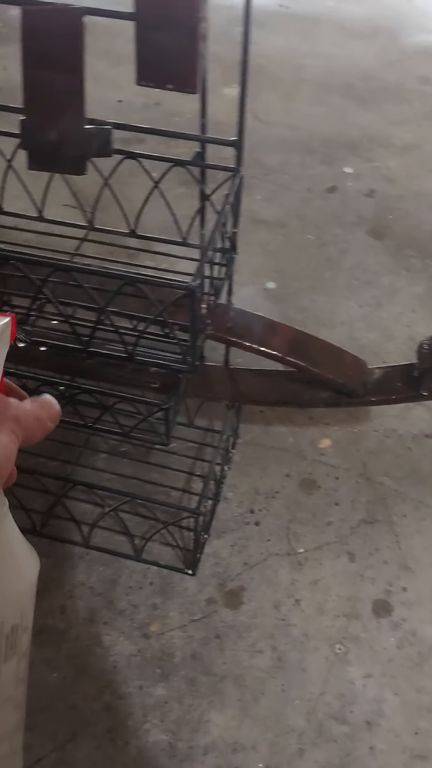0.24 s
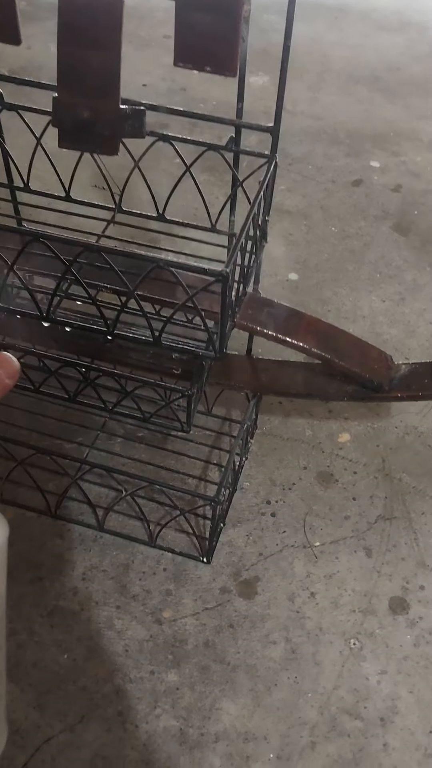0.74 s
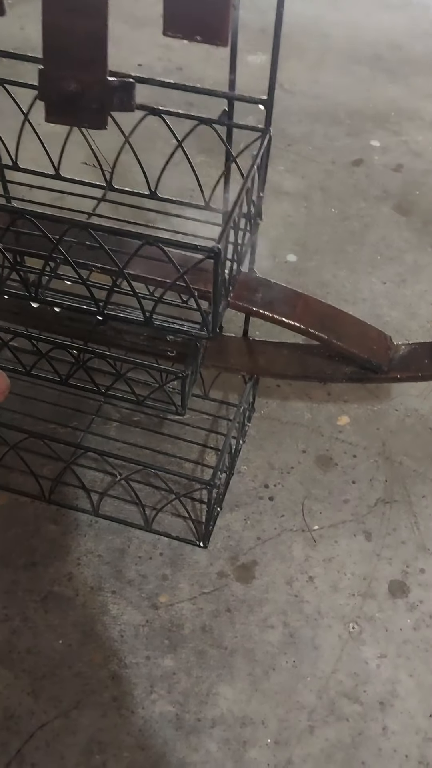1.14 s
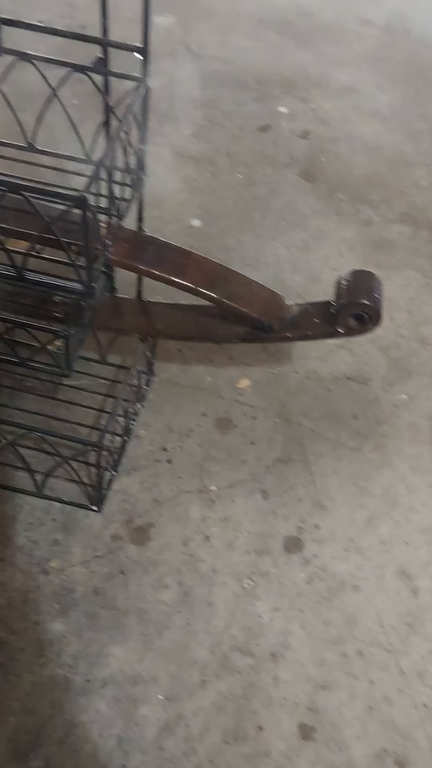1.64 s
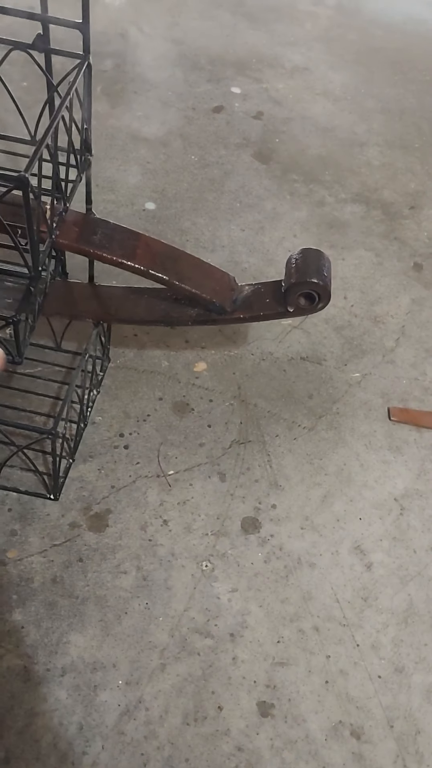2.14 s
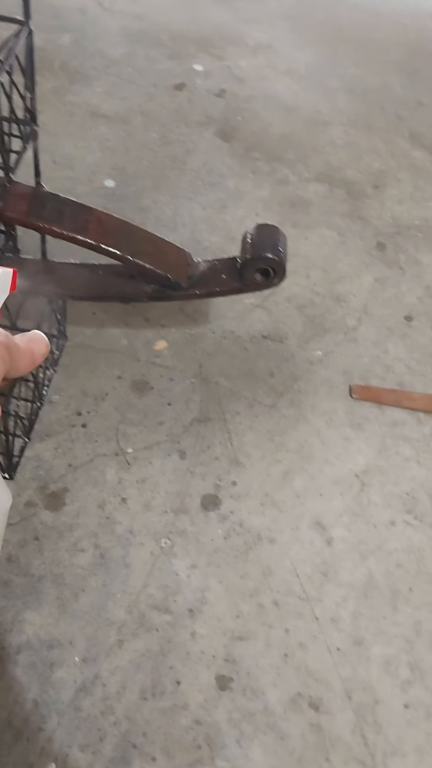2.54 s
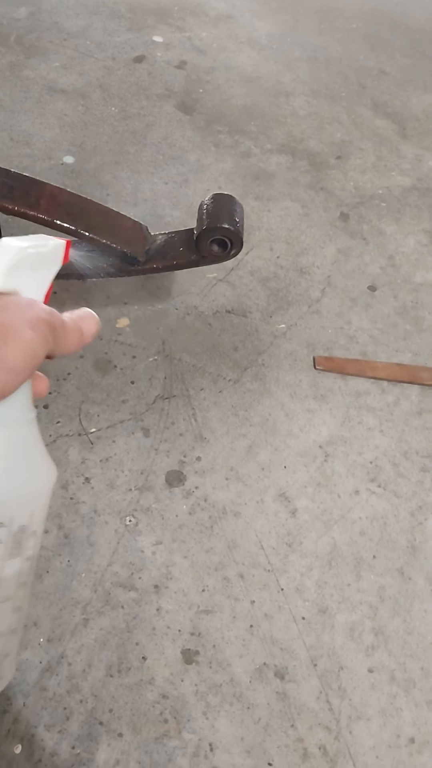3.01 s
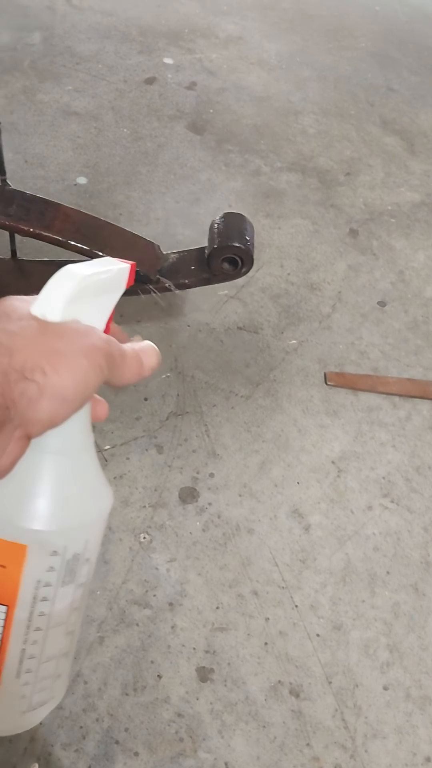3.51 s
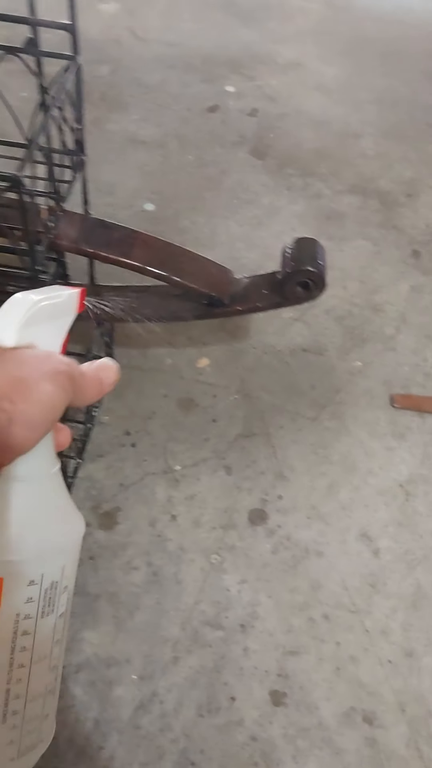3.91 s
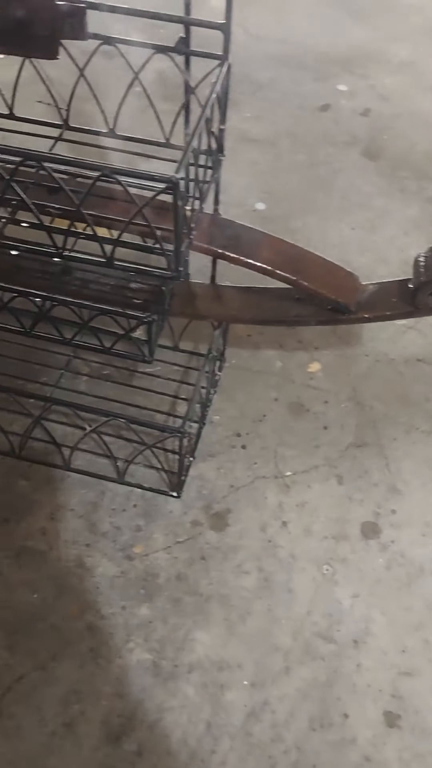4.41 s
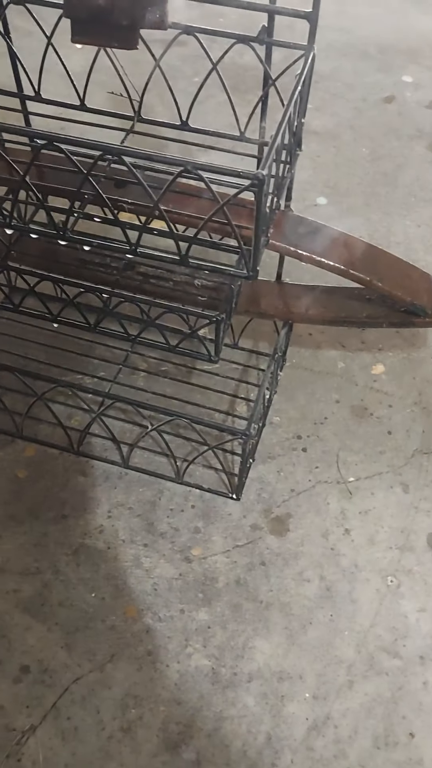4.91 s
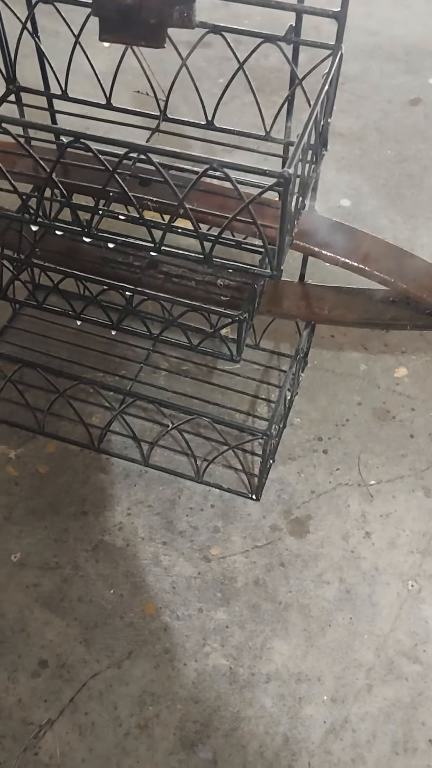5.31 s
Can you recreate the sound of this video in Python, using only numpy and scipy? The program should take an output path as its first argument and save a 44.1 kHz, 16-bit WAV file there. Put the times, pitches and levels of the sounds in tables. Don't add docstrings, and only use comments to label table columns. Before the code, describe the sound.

Phone-like stereo pickup at arm's length in a hard garage: steady rapid squirts of sputtering, fizzy spray, alternating with valve clicks, brief wet suction and small piston thuds. A sharp bottle-on-metal crack lands before two seconds, then a duller knock with a low wobble of the rack. Pumping continues evenly to the end, over fading engine rumble and soft outside traffic murmur.

```python
import sys
import numpy as np
from scipy import signal
from scipy.fft import rfft, irfft, next_fast_len
from scipy.io import wavfile
from scipy.ndimage import uniform_filter1d

SR = 44100
rng = np.random.default_rng(int(sys.argv[2]) if len(sys.argv) > 2 else 0)


def transcribe(u):
    v = np.clip(np.atleast_2d(u).T, -1, 1)
    q = np.round(v * 32767).astype(np.int16)
    wavfile.write(sys.argv[1], SR, q)


def linear_from_db(decibels):
    return 10 ** (np.asarray(decibels, float) / 20)


N = 244755
TIME, HZ = np.arange(N) / SR, np.fft.rfftfreq(N, 1 / SR)


def unit(x):
    return x / np.sqrt(np.mean(x ** 2))


def shape(points):
    hz, db = np.transpose(points)
    return linear_from_db(np.interp(np.log(HZ + 1), np.log(hz + 1), db))


def peak(hz, width):
    return 1j * HZ * width / (hz ** 2 - HZ ** 2 + 1j * HZ * width)


def filt(x, response):
    return irfft(rfft(x) * response, N)


def coloured(response):
    return unit(filt(rng.standard_normal((3, N)), response))


def walk(rate):
    hold = max(int(SR / rate), 1)
    levels = rng.standard_normal(N // hold + 1)
    return unit(uniform_filter1d(np.repeat(levels, hold)[:N], hold))


def restless(points, shared_db, own_db, rate, patchy_db=0):
    colour = shape(points)
    white = rfft(rng.standard_normal((3, N))) * colour
    out = 0
    for hz in 30 * 2 ** np.arange(0, 9.4, 1 / 3):
        gain = linear_from_db(shared_db + own_db * walk(rate) + patchy_db * walk(14))
        skirt = np.clip(1 - 3 * np.abs(np.log2((HZ + 1) / hz)), 0, 1)
        if (skirt * colour).max() > colour.max() / 300:
            out = out + irfft(white * skirt, N) * gain
    return unit(out)


def puffs(s, db, rise, fall):
    out = np.zeros(N)
    t = np.arange(4096) / SR
    burst = (1 - np.exp(-t / rise)) * np.exp(-t / fall)
    for at, level in zip(s, db):
        i = int(at * SR)
        out[i:i + 4096] += (linear_from_db(level) * burst)[:N - i]
    return out


def ring(at, hz, db, t60):
    out = np.zeros(N)
    i = int(np.ceil(at * SR))
    t = TIME[i:i + int(2 * t60 * SR)] - at
    out[i:i + len(t)] = linear_from_db(db) * np.sin(2 * np.pi * hz * t) * np.exp(-np.log(1000) * t / t60)
    return out


def grains(s, hz, db, cycles, glide):
    t = np.arange(512) / SR
    hz = np.asarray(hz)[:, None]
    turns = hz * t * (1 + glide * hz * t / cycles / 2)
    envelope = np.exp(-hz * t / cycles) * (1 - t / t[-1]) * np.minimum(hz * t / 2, 1)
    wave = linear_from_db(db)[:, None] * np.sin(2 * np.pi * turns) * envelope
    at = (np.asarray(s) * SR).astype(int)[:, None] + np.arange(512)
    return np.bincount(at.ravel(), wave.ravel(), N + 512)[:N]


def motor_hum():
    hz = 59.26 + 0.28 * walk(3.15)
    level = linear_from_db(-52.5 + 1.7 * walk(4.77))
    return np.sqrt(2) * level * np.sin(2 * np.pi * np.cumsum(hz) / SR)


# (frequency [Hz], level [dB per Hz])
GARAGE_AIR = [(15, -22.5), (25, 0.5), (102, 2), (263, -12.5), (405, -20), (575, -21), (775, -22.5),
              (911, -21), (1230, -29), (1400, -23), (1890, -31.5), (2160, -29), (2990, -32), (4490, -35),
              (10000, -47), (16000, -44.5)]
# (time [s], level [dB])
STREET = [
    (0.0, -67),
    (0.54, -76),
    (0.82, -74),
    (1.0, -65),
    (2.0, -67.5),
    (2.4, -74),
    (2.6, -66),
    (4.44, -72.5),
    (5.55, -70),
]


def garage_air():
    mid, side, _ = restless(GARAGE_AIR, 0, 3.1, 6)
    air = mid + filt(side, np.clip(HZ / 1300, .05, 1)) * np.array([[1], [-1]])
    low = np.clip((400 - HZ) / 150, 0, 1)
    below_hiss = np.clip((1300 - HZ) / 400, 0, 1)
    s, murmur_db = np.transpose(STREET)
    rumble = filt(air, low) * linear_from_db(-54.5 - 1.1 * TIME)
    murmur = filt(air, below_hiss - low) * linear_from_db(np.interp(TIME, s, murmur_db) + 14.0)
    return rumble + murmur + filt(air, 1 - below_hiss) * linear_from_db(-53.5)


# (full pressure [s], hiss [dB], build-up [dB/s], sag [dB/s],
# body of the jet re hiss [dB])
SQUEEZES = [(-.015, -38, 500, 218, -18), (0.378, -38.5, 335, 170, -16.5), (0.799, -38, 512, 170, -17),
            (1.25, -39, 450, 167, -15), (1.701, -41, 570, 131, -12), (2.12, -40.5, 565, 188, -16.5),
            (2.508, -39, 612, 132, -16.5), (2.937, -39.5, 373, 168, -18), (3.339, -39.5, 490, 176, -17.5),
            (3.77, -38, 660, 188, -19), (4.214, -39.5, 670, 147, -15.5), (4.634, -40.5, 404, 125, -16),
            (5.081, -39, 622, 162, -19), (5.486, -39.5, 525, 148, -17.5)]


def pressure():
    hold_s, open_s = 0.031, 0.058
    hiss, body = np.zeros(N), np.zeros(N)
    releases = [row[0] for row in VALVE] + [N / SR]
    for (s, db, rise, sag, body_db), release in zip(SQUEEZES, releases):
        up = rise * np.maximum(s - TIME, 0)
        down = sag * (np.hypot(np.maximum(TIME - s, 0), hold_s) - hold_s)
        shut = 1500 * np.maximum(s - open_s - TIME, 0)
        dribble = 245 * np.maximum(TIME - release, 0)
        hiss += linear_from_db(db - up - down - shut - dribble)
        body += linear_from_db(db + body_db - 0.55 * up - 0.97 * down - shut - dribble)
    return hiss, body


# (frequency [Hz], level [dB per Hz])
JET = [(2200, -15.5), (2800, -6), (3400, -5), (4000, 2.5), (5200, -1.5), (6600, 5), (8000, 2), (9200, -3),
       (10000, -9.5), (11000, -4.5), (12500, 3), (15000, 3), (16500, 1.5)]
# (frequency [Hz], level [dB per Hz])
JET_BODY = [(290, -52), (500, -18), (871, -4.5), (1210, -12), (1630, -3), (2050, 0.5), (2570, -7),
            (2800, -24), (3640, -49), (6160, -120)]
# (time [s], peak [dB])
FIRST_DROPS = [(0.3333, -29), (0.756, -43), (1.2007, -54), (1.675, -46), (2.0687, -53), (2.485, -36.5),
               (2.8887, -44), (3.317, -37), (3.731, -47), (4.586, -44), (5.444, -47)]
# (time [s], peak [dB], pop [Hz])
SPITS = [(0.3406, -30, 4690), (0.3645, -37, 4400), (0.4788, -38, 4530), (0.497, -37, 6400),
         (0.5838, -39, 3660), (0.795, -27, 4600), (0.806, -24, 6530), (0.863, -47, 6550),
         (0.9214, -37, 6510), (1.2412, -37, 6760), (1.247, -42, 6400), (1.391, -47, 6890),
         (1.415, -43, 4400), (1.694, -31, 6500), (2.095, -41, 6390), (2.1105, -33, 6260),
         (2.504, -26, 4100), (2.675, -44, 4670), (2.711, -33, 3430), (2.93, -36, 4200), (3.346, -25, 7950),
         (3.508, -46, 3930), (3.75, -35, 6000), (4.2145, -32, 6500), (4.332, -33.5, 6090),
         (4.608, -36, 6190), (4.716, -32, 6850), (4.768, -34, 8000), (5.067, -36, 5900), (5.481, -32, 7960)]


def jet():
    hiss, body = pressure()
    sputter_db = 1.67 * walk(220) + 0.99 * walk(45)
    when, pitch, size = rng.random((2500, 3)).T
    fizz_db = -14 - 1.8 * np.log(size)
    fizz = grains(when * N / SR, 1500 * 6.0 ** pitch, fizz_db, cycles=2.7, glide=0.01)
    s, db, hz = np.transpose(SPITS + [(at, level, 4420) for at, level in FIRST_DROPS])
    spit = puffs(s, db - 1.5, 0.00036, 0.59 * 0.0025)
    pops = spit * coloured(shape(JET)) + grains(s, hz, db - 7.5, cycles=10.0, glide=0.017)
    hiss = hiss + puffs(s, db - 19, 0.0015, 0.0081)
    spray = hiss * (linear_from_db(2.5) * restless(JET, sputter_db, 2.1, 70, patchy_db=1.25) + fizz)
    body_noise = restless(JET_BODY, 0.27 * sputter_db, 3.65, 60, patchy_db=0.3)
    return spray + pops + (linear_from_db(2.0) * body + linear_from_db(-29) * spit) * body_noise


# (frequency [Hz], level [dB per Hz])
CLICK = [(590, -55), (1000, -39), (2980, 0), (3630, -1), (4280, -10), (5110, -1), (13000, -16),
         (15700, -12), (16500, -36)]
# (time [s], peak [dB], centre [Hz], suction [dB])
VALVE = [(0.152, -31.5, 3200, -54), (0.563, -30, 4270, -55.5), (0.988, -31.5, 3100, -53.5),
         (1.4351, -33, 4320, -54.5), (1.8604, -15.5, 3500, -59), (2.2934, -37, 4140, -54),
         (2.728, -22.5, 3560, -52), (3.1065, -33, 2800, -54.5), (3.5284, -33.5, 3930, -56),
         (3.969, -32, 2600, -54), (4.4198, -34, 2850, -54.5), (4.829, -32.5, 2730, -57),
         (5.2588, -37, 2603, -55.5)]


def valve_clicks():
    s, db = np.transpose(VALVE)[:2]
    click = puffs(s, db - 5.0, 0.00062, 0.0021) * coloured(shape(CLICK))
    return click + sum(ring(at, hz, level - 12.0, 0.022) for at, level, hz, _ in VALVE)


# (frequency [Hz], level [dB per Hz])
SUCTION = [(410, -87), (700, 3), (910, -4.5), (1310, -6), (1800, -3), (2100, 6), (2700, 3), (3600, -1),
           (7290, -6), (14800, -30), (16000, -26)]
# (first [Hz], last [Hz])
GURGLE = [(3000, 3700), (2600, 4130), (2300, 3850), (2460, 3730), (2500, 3470), (2570, 3900), (2300, 3230),
          (2640, 3160), (2570, 3500), (2610, 3360), (2600, 3870), (2660, 4700), (2970, 2130)]


def suction():
    start, _, _, suck_db = np.transpose(VALVE)
    stop = np.transpose(STOPS)[0]
    flow = np.zeros(N)
    for a, b, db in zip(start, stop, suck_db):
        swell_db = 4.56 * np.clip((TIME - a) / (b - a), 0, 1)
        cutoff_db = 420 * np.maximum(TIME - b - .004, 0)
        flow += (TIME > a) * linear_from_db(db + swell_db - cutoff_db)
    first_hz, last_hz = np.transpose(GURGLE)
    part, detune, size = rng.random((len(start), 22, 3)).T
    when = start + 1.3 * part * (stop - start)
    hz = first_hz * (last_hz / first_hz) ** part * (1 + 0.15 * (detune - .5))
    gurgle = grains(when.ravel(), hz.ravel(), 4.7 * size.ravel() - 1.2, cycles=10.5, glide=0.017)
    rush = linear_from_db(-2.5) * restless(SUCTION, 0.92 * walk(250), 4.4, 120, patchy_db=-0.5)
    return flow * (rush + gurgle)


# (time [s], peak [dB], centre [Hz], low thud re peak [dB])
STOPS = [(0.2012, -45.5, 2130, -12), (0.608, -35.5, 2110, -24), (1.0319, -38, 2100, -19),
         (1.4722, -35, 1870, -22), (1.911, -38.5, 1650, -28), (2.3288, -35, 1690, -24),
         (2.7544, -60.5, 2020, -24), (3.1487, -38.5, 1870, -17), (3.575, -36, 1930, -25),
         (4.0136, -39, 1500, -20), (4.4646, -37.5, 1850, -19), (4.8836, -45, 2300, -28),
         (5.3021, -40, 1870, -20)]


def piston_stops():
    s, db = np.transpose(STOPS)[:2]
    out = puffs(s, db - 3.0, 0.0012, 0.002) * coloured(peak(1200, 1500))
    for at, level, hz, low_db in STOPS:
        out = out + ring(at, hz, level - 10.0, 0.027) + ring(at, 250, level + low_db + 7.0, 0.039)
    return out


# (time [s], peak [dB])
TICKS = [(0.288, -51.5), (0.6992, -50), (1.1209, -49), (1.5687, -47.5), (2.0038, -50.5), (2.4269, -59),
         (2.8479, -55), (3.244, -53.5), (3.6674, -52.5), (4.1066, -49), (4.555, -49), (4.977, -53.5),
         (5.3961, -58)]


def trigger_ticks():
    return puffs(*np.transpose(TICKS), 0.00059, 0.0024) * coloured(shape(CLICK))


# (time [s], peak [dB], centre [Hz])
SLAPS = [
    (0.9182, -44, 484),
    (.926, -44, 600),
    (0.9388, -45, 560),
    (0.959, -48, 560),
    (1.839, -46, 1800),
    (2.352, -40, 215),
    (2.757, -48, 192),
    (3.952, -57, 1500),
    (4.382, -49.5, 915),
    (4.816, -47, 1100),
]


def liquid_slaps():
    return sum(ring(s, hz, db, 7.0 / hz) for s, db, hz in SLAPS)


# (time [s], crack [dB], ring [dB])
KNOCKS = [
    (1.861, -23, -37),
    (2.726, -46, -39),
]
# (frequency [Hz], level [dB], t60 [s])
RINGS = [
    [(695, -5, 0.023), (920, -6, .02), (1500, -9, 0.052), (2100, -10, 0.07), (3270, -14, 0.017)],
    [(530, -41, 0.026), (730, -8, 0.044), (1100, -13, .02), (1730, 6, 0.028), (2040, 9.5, 0.017),
     (2216, -2, 0.03), (2940, -2, 0.012), (4180, -5, 0.024), (5730, 2.5, 0.01)],
]
# (frequency [Hz], level [dB], t60 [s])
THUMPS = [
    [(141, -60, 0.22), (175, -68, 0.071), (215, -34, 0.094), (242, -37.5, 0.063), (305, -47, 0.16)],
    [(148, -53, 0.15), (210, -39.5, 0.13), (245, -42.5, 0.087), (277, -43.5, 0.11), (308, -43.5, 0.14)],
]


def rack_knocks():
    mid, side = unit(filt(rng.standard_normal((2, N)), peak(2000, 4200)))
    crack = mid + side * np.array([[1], [-1]])
    # (delay [s], level [dB])
    contacts = [(0, -2), (.0021, -2.5), (.0045, -2.5), (.0072, -4.5), (.016, -47), (.029, -15)]
    out = 0
    for (s, crack_db, ring_db), modes, thump in zip(KNOCKS, RINGS, THUMPS):
        snap = puffs([s], [crack_db], 0.0012, 0.0019)
        scrape = puffs([s], [crack_db - 22.5], 0.009, 0.026)
        out = out + crack * (snap + scrape)
        out = out + sum(ring(s + 0.00226, hz, db, t60) for hz, db, t60 in thump)
        for late, contact_db in contacts:
            for hz, db, t60 in modes:
                luck_db = 4.5 * rng.standard_normal()
                out = out + ring(s + late, hz, ring_db + db + contact_db + luck_db, t60)
    return out * linear_from_db(np.array([[-1.5], [1.5]]))


# (time [s], frequency [Hz], level [dB], t60 [s])
SWAY = (2.7535, 139, -37.5, 0.3)


def rack_sway():
    return ring(*SWAY)


def room(x):
    t = np.maximum(TIME - .004, 0)
    bass, treble = (np.exp(-np.log(1000) * t / t60) * (t > 0) for t60 in (0.42, 0.18))
    dull = 1 / (1 + 1j * HZ / 2500)
    size = next_fast_len(N + SR)
    source = rfft(x, size)
    wet = []
    for _ in range(2):
        low = rfft(rng.standard_normal(N) * bass) * dull
        high = rfft(rng.standard_normal(N) * treble) * (1 - dull)
        tail = irfft(low + high, N)[:SR]
        wet.append(irfft(source * rfft(tail / np.linalg.norm(tail), size), size)[:N])
    return linear_from_db(-10.5) * np.array(wet)


# (frequency [Hz], left minus right [dB])
PORTS = [(60, 16), (250, -7), (700, -0.5), (2000, -5.5), (2700, -3), (4000, -1.5), (7000, 1), (8300, -2.5),
         (9200, 2), (10000, 5), (11000, 9.5), (12500, 6.5), (16000, 6)]
# (frequency [Hz], left leads [rad])
LEAD = [(0, 0), (1000, 1.67), (1500, 0.23), (2000, 0.5), (2600, 3.5), (16000, 21)]
# (frequency [Hz], share common to both [0-1])
ALIKE = [(300, 0.95), (900, 0.66), (2000, 0.41), (2800, 0.69), (3600, 0.19), (6800, 0.46), (9000, 0.27),
         (16000, 0.14)]


def ports(same, left, right, walls):
    tilt = np.sqrt(shape(PORTS))
    share = np.clip(np.interp(HZ, *np.transpose(ALIKE)), 0, 1)
    common = filt(same, np.sqrt(share))
    near = common + filt(left, np.sqrt(1 - share)) + walls[0]
    far = common + filt(right, np.sqrt(1 - share)) + walls[1]
    lead = np.exp(1j * np.interp(HZ, *np.transpose(LEAD)))
    return np.array([filt(near, tilt * lead), filt(far, 1 / tilt)])


def scene():
    bottle = jet() + valve_clicks() + suction() + piston_stops() + trigger_ticks() + liquid_slaps()
    blows = rack_knocks() + rack_sway()
    walls = room(filt(bottle[0] + blows[1], np.clip(HZ / 450, .1, 1)))
    return ports(*bottle, walls) + blows + motor_hum() + garage_air()


def roll_off(x):
    return signal.sosfilt(signal.butter(12, 17030, fs=SR, output="sos"), x)


def record(dry):
    mic = shape([(20, -19), (38, -5.5), (52, -1.0), (15800, -0.5), (16050, -34), (16600, -47), (17000, -70)])
    return roll_off(filt(dry, mic))


dry = scene()
out = record(dry)
transcribe(out)
```